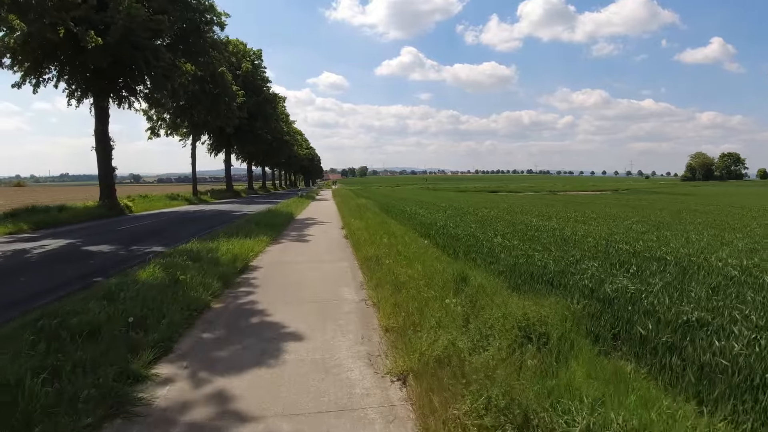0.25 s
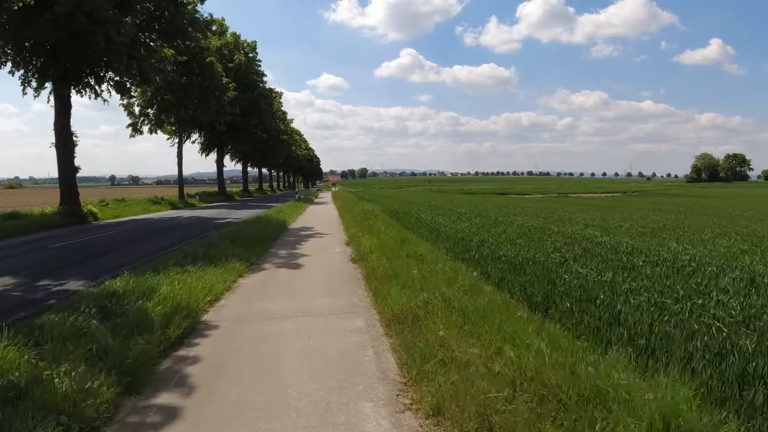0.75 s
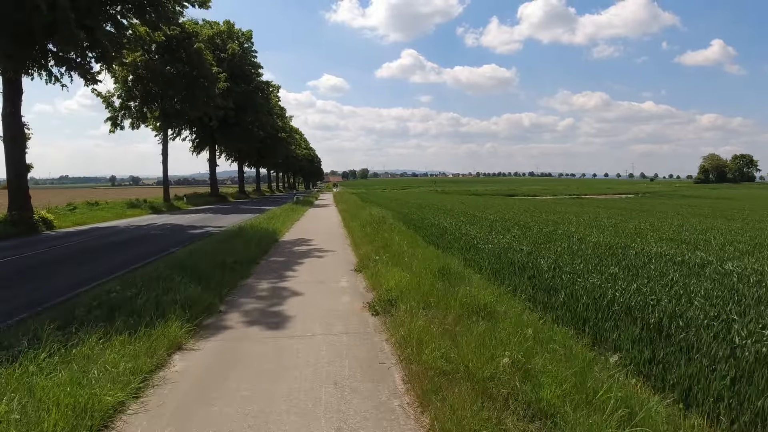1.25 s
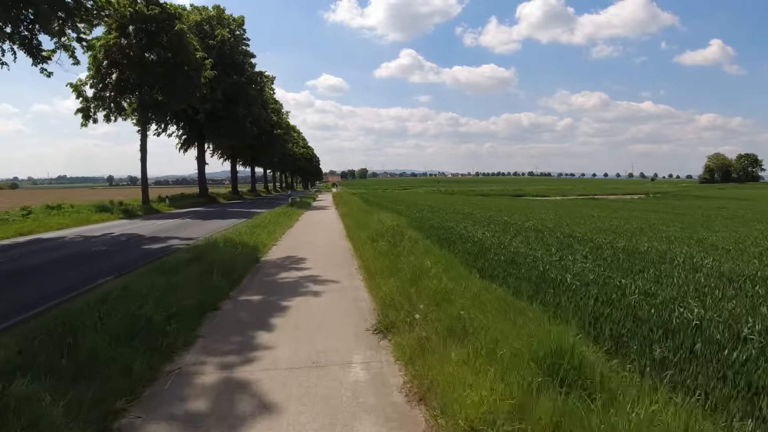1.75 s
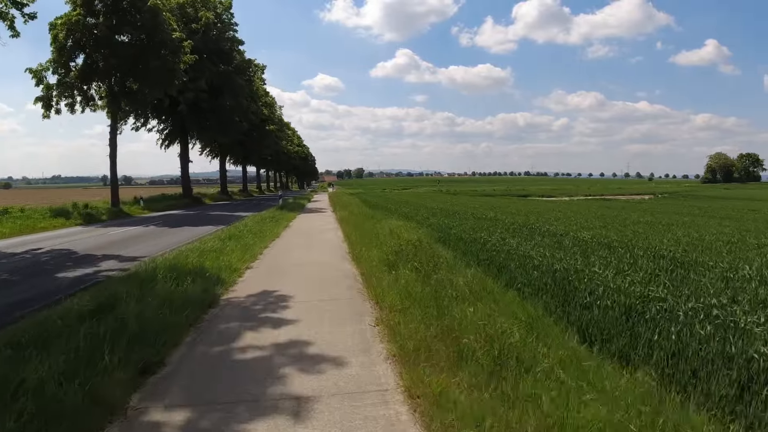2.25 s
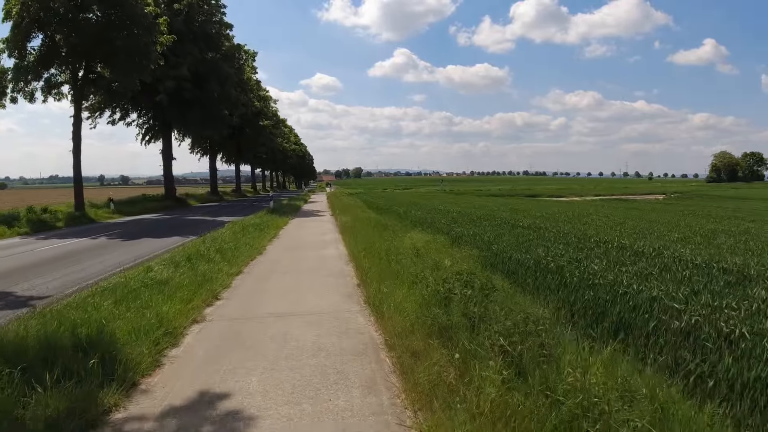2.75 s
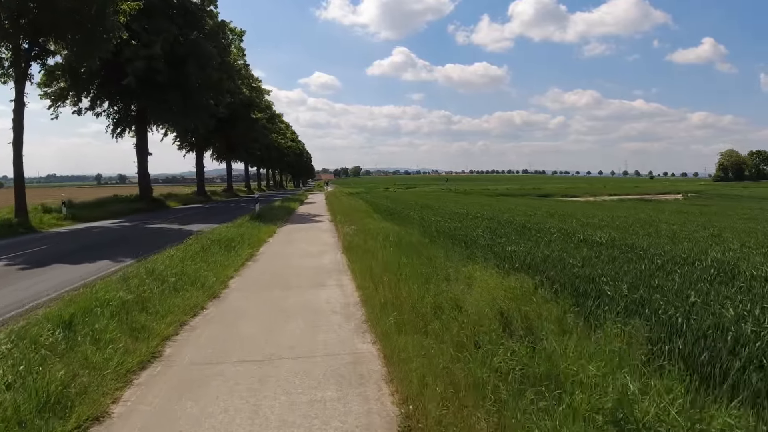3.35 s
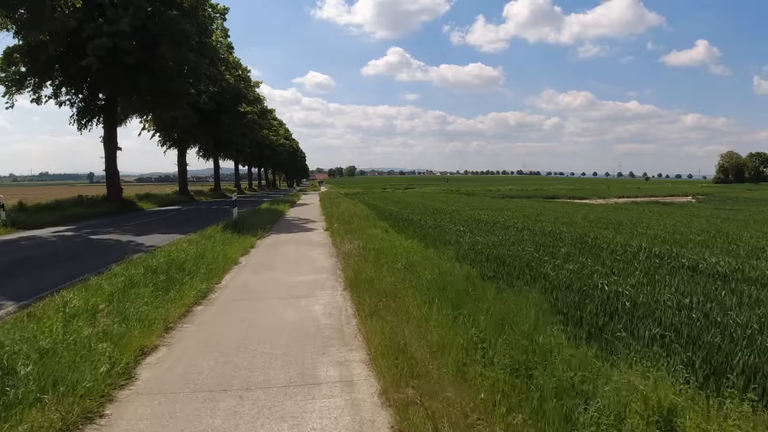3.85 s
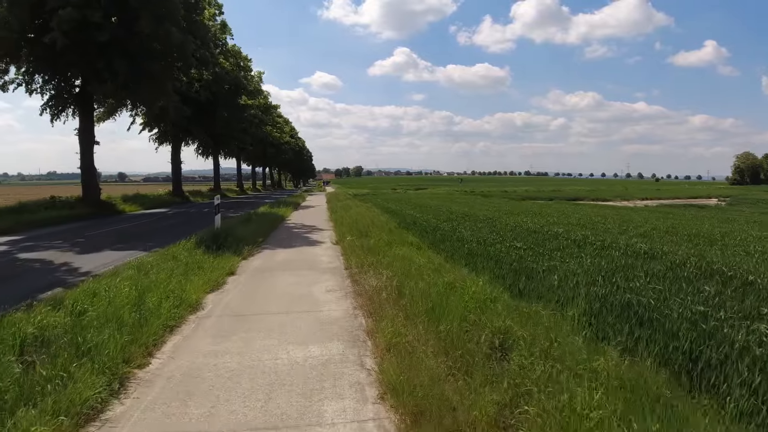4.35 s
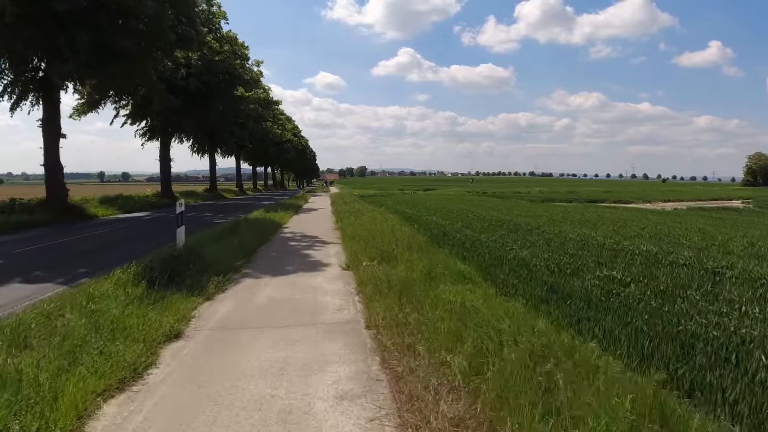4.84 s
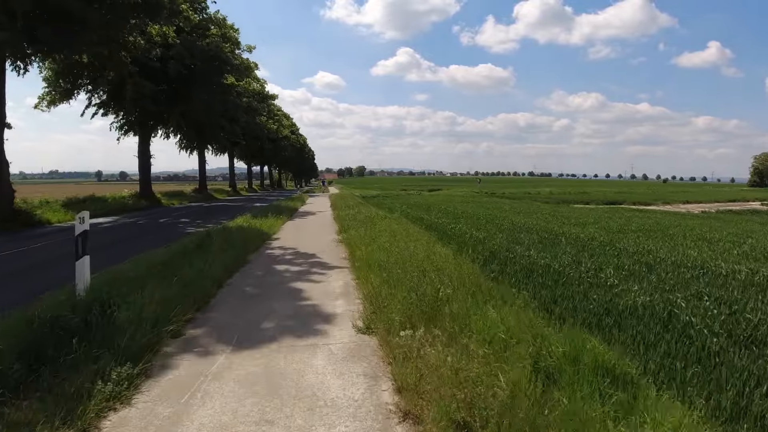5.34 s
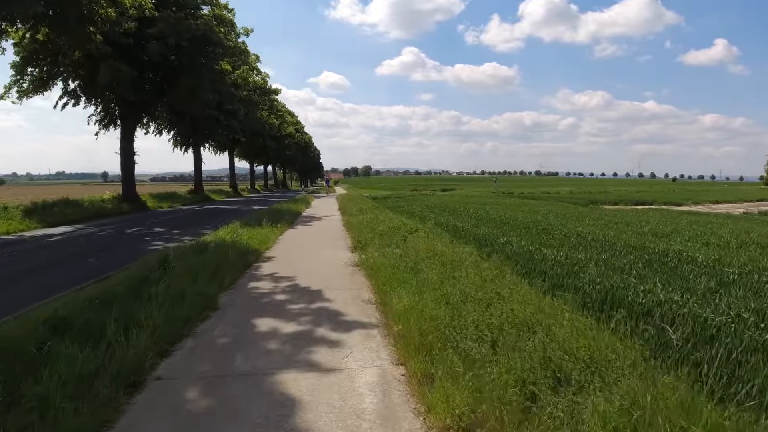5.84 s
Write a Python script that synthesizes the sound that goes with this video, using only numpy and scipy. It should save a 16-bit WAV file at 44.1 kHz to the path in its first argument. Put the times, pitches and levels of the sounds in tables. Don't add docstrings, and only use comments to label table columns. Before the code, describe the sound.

Heard from on board, an electric kick scooter rolls at even speed on a paved path between open fields. A wavering motor hum sits over coarse tyre roar and grit. Wind thumps and flutters at the stereo microphone, strongest around two seconds, then mostly eases. Loose parts click and rattle on bumps, the deck knocks dully now and then, and the last second or so is rougher, with sharp clatter.

```python
import sys
import numpy as np
from scipy import signal
from scipy.fft import rfft, irfft, next_fast_len
from scipy.io import wavfile
from scipy.ndimage import uniform_filter1d

SR = 44100
rng = np.random.default_rng(int(sys.argv[2]) if len(sys.argv) > 2 else 0)


def store_pcm(level_fs):
    pcm = np.round(np.clip(level_fs, -1, 1) * 32767).astype(np.int16)
    wavfile.write(sys.argv[1], SR, np.atleast_2d(pcm).T)


def level_to_linear(level):
    exponent = np.asarray(level, float) / 20
    return 10 ** exponent


N = 268613


def rms_one(x):
    return x / np.sqrt(np.mean(x ** 2) + 1e-20)


def in_time(rows):
    s, *columns = np.transpose(rows)
    return [np.interp(np.arange(N) / SR, s, column) for column in columns]


def at_hz(points, hz):
    table_hz, value = np.transpose(points)
    return np.interp(np.log(hz + 1), np.log(table_hz), value)


def drift(rate):
    r = np.exp(-80 * np.pi * rate / SR)
    slow = signal.lfilter([1], [1, -2 * r, r * r], rng.standard_normal(N // 40 + 2002))[2000:]
    return np.interp(np.arange(N) / 40, np.arange(len(slow)), rms_one(slow))


def coloured(x, response):
    margin = 4096
    size = next_fast_len(N + 2 * margin)
    x = np.pad(x, [(0, 0)] * (x.ndim - 1) + [(margin, margin)], mode="reflect")
    hz = np.arange(size // 2 + 1) * SR / size
    return irfft(rfft(x, size) * response(hz), size)[..., margin:margin + N]


def noise(colour, channels):
    return rms_one(coloured(rng.standard_normal((channels, N)), lambda hz: level_to_linear(at_hz(colour, hz))))


def evened(x, seconds, share):
    length = int(seconds * SR)
    power = uniform_filter1d(uniform_filter1d(x ** 2, length), length)
    return rms_one(x / (power + 0.018) ** (share / 2))


def humps(times, widths):
    time = np.arange(0, N + 32, 32) / SR
    return np.exp(-.5 * ((time - np.reshape(times, (-1, 1))) / np.reshape(widths, (-1, 1))) ** 2)


def summed(weights, shapes):
    return np.interp(np.arange(N) / 32, np.arange(shapes.shape[1]), weights @ shapes)


def ring(clicks, hz, t60):
    r, w = level_to_linear(-60 / (t60 * SR)), 2 * np.pi * hz / SR
    return signal.lfilter([0, np.sin(w)], [1, -2 * r * np.cos(w), r * r], clicks + 1e-18)


def bursts(rows, cycles, level_db, rise_share):
    out = np.zeros(N + 2 * SR)
    for s, db, hz in rows:
        u = np.arange(-round(4 * cycles / hz * SR), round(5 * cycles / hz * SR)) / SR
        width = cycles / hz * np.where(u < 0, rise_share, 2 - rise_share)
        at = SR + round((s + u[0]) * SR)
        out[at:at + len(u)] -= level_to_linear(db + level_db) * np.exp(-.5 * (u / width) ** 2) * np.sin(2 * np.pi * hz * u)
    return out[SR:SR + N]


# time_s, winding_pitch_hz, motor_load_db, surface_roughness_db
RIDE = [(0.0, 193.6, -47.5, -1.5), (.5, 196.4, -47.5, -1.5), (.8, 195.0, -51.5, -0.5),
        (1.25, 193.8, -48, -2.5), (1.55, 195.5, -48.5, 0), (2.15, 194.4, -50.5, -2.5),
        (2.45, 194.5, -45.5, -1.5), (2.9, 195.0, -47, -1), (3.4, 196.1, -47, 0.5), (3.75, 196.2, -45, 1.7),
        (4.2, 194.7, -44.5, 0.4), (4.55, 195.4, -46.5, 0.4), (4.85, 196.3, -46, 2),
        (5.3, 196.4, -49.5, 3.5), (5.5, 196.0, -44.5, 2.9), (5.7, 197.5, -48.5, 0), (6.09, 196.8, -46, 2.5)]
# time_s, change_db
SURGES = [(.18, -7), (.35, -10), (0.579, -7), (.83, 0.5), (.94, -5), (1.09, -1), (1.16, -2.5), (1.37, 0.5),
          (1.45, -1.5), (1.74, -12.5), (1.94, -4.5), (2.07, -5), (2.23, -16), (2.36, -10.5), (2.62, -2.5),
          (3.01, 0.5), (3.2, -1.5), (3.27, -2.5), (3.47, -0.5), (3.62, -2.5), (3.89, -7), (4.088, -3.5),
          (4.22, -4), (4.34, -5.5), (4.45, -9), (4.55, -6), (4.66, -7.5), (4.95, -6.5), (5.07, -3),
          (5.21, -8),
          (5.32, -29), (5.39, -9.5), (5.55, -3), (5.78, -5.5), (5.9, 3.5), (3.15, 6), (3.73, -0.5),
               (3.97, -3), (4.802, 6), (5.02, 5), (5.26, 10)]
# multiple_of_winding_pitch, level_db
MOTOR_ORDERS = [(.995, -16), (2, 0), (2.968, -10), (3.96, -21)]


def motor():
    pitch_hz, load_db, _ = in_time(RIDE)
    s, change_db = np.transpose(SURGES)
    hum_db = load_db + 0.98 * summed(change_db, humps(s, 0.024))
    turn = 2 * np.pi * np.cumsum(pitch_hz * (1 + 0.00299 * drift(0.8014))) / SR
    orders = 0
    for multiple, db in MOTOR_ORDERS:
        wobble_rad = .3 * multiple * drift(5)
        orders = orders + level_to_linear(db + 2.4 * drift(15)) * np.sin(multiple * turn + wobble_rad)
    return level_to_linear(hum_db + 2.5) * orders


# pitch_hz, width_hz, height_above_noise_db
FRAME = [(376.5, 7.8, 13.5), (410, 44.5, 11.5), (452, 39, 4.5), (589.4, 19, 9.5), (654.5, 7.8, 10),
         (765, 79, 7.5), (908, 7.8, 9.5), (1102, 45, 10.5), (1142, 40, 11), (1198, 37, 6.5),
         (1496, 79, 5.5), (1634, 17, 9), (1725, 58, 7.5), (2600, 53, 7.5), (3058, 52, 9), (3462, 53, 10.5),
         (3960, 100, 2.5), (5320, 150, 8.5)]


def frame_gain(hz):
    peaks = [level_to_linear(2 * db) / (1 + (2 * (hz - centre) / width) ** 2) for centre, width, db in FRAME]
    return np.sqrt(1 + sum(peaks))


def patchy(x):
    centres = 420 * 2 ** np.arange(0, 3.6, .5)
    out = 0
    for k in range(len(centres)):
        only_k = np.arange(len(centres)) == k
        band = coloured(x, lambda hz: np.interp(np.log(hz + 1), np.log(centres), only_k))
        out = out + band * level_to_linear(1.12 * drift(6.2) - 0.45)
    return out


# pitch_hz, level_db
ROAR = [(60, -30.5), (150, -16.5), (330, -9.5), (460, -3.5), (650, -5), (720, -15), (950, -8),
        (1350, -12.5), (2000, -22.5), (3000, -46.5), (6000, -95)]
GRIT = [(400, -38.5), (900, -18.5), (1600, -3), (2200, -4), (3200, -12.5), (4000, -13.5), (5000, -25.5),
        (5600, -40.5), (7000, -62.5), (9000, -72.5)]


def tyres(rough_db):
    roar = noise(ROAR, channels=2) * level_to_linear(1.0 * drift(11.0) + 0.46 * drift(60))
    grit = noise(GRIT, channels=2) * level_to_linear(0.68 * drift(17.0) + 0.51 * drift(100))
    roar = rms_one(coloured(roar, frame_gain)) * level_to_linear(-47.5 + 0.74 * rough_db)
    grit = rms_one(coloured(grit, frame_gain)) * level_to_linear(-56 + 0.71 * rough_db)
    return patchy(roar + grit)


# pitch_hz, level_db
HISS = [(2000, -34), (4500, -8.5), (6000, -0.5), (7800, -5.5), (9000, -1), (11500, -1), (12600, 1.5),
        (13500, 5), (14300, -4), (16000, -13)]


def hiss(rough_db):
    time = np.arange(N) / SR
    hiss_db = -91 + 0.27 * time + 0.3 * rough_db
    body = noise(HISS, channels=2) * level_to_linear(hiss_db + 6.0 + 0.91 * drift(8))
    sheen = coloured(body, lambda hz: 1 / (1 + (12500 / (hz + 1)) ** 60))
    sheen_gain = level_to_linear(-11.5 + 1.6 * time + 3.0 * drift(9.0))
    return body + sheen * (sheen_gain - 1)


# pitch_hz, level_db
RUMBLE = [(12, -38.5), (30, -1.5), (100, -5), (200, -26), (300, -29), (1000, -86.5)]


def rumble():
    return level_to_linear(-54) * noise(RUMBLE, channels=1)


# pitch_hz, level_db
WIND_COLOUR = [(5, -41), (18, 0), (30, 2), (60, 1), (110, -1.5), (160, -11.5), (240, -22), (400, -48),
               (1500, -110)]
FLUTTER_COLOUR = [(20, -59.5), (60, -31), (120, -3.5), (170, -4), (220, -6.5), (300, -48.5), (900, -75.5),
                  (3000, -120)]
WHIP_COLOUR = [(60, -62), (200, -13.5), (260, -5), (330, -5.5), (450, -9.5), (700, -22.5), (3000, -100)]
# time_s, level_db
BREEZE = [(0.0, -49.5), (.3, -50.5), (.7, -43.5), (1.0, -44.5), (1.22, -46), (1.4, -46.5), (1.6, -49),
          (1.9, -51), (2.3, -34.5), (2.53, -38), (2.62, -52.5), (2.92, -67), (3.2, -60), (3.66, -60.5),
          (3.85, -46.5), (4.9, -51), (5.55, -48), (6.09, -46)]
# peak_s, peak_db, half_length_s, flutter_relative_db
GUSTS = [(0.107, -44, 0.036, -18), (0.404, -43, 0.042, -9.5), (0.49, -32.5, 0.019, -25),
         (0.714, -44, 0.036, 3), (0.795, -23, 0.011, -7.5), (0.865, -45.5, 0.037, 5),
         (1.086, -34.5, 0.016, -6), (1.314, -57, 0.011, 10), (1.46, -41.5, 0.045, 1.5),
         (1.48, -29, 0.027, 0), (1.608, -39, 0.015, -4), (1.71, -34, 0.028, 1.5), (1.738, -50, 0.011, 0),
         (1.848, -32.5, 0.037, -4), (1.937, -33.5, 0.024, -2.5), (2.052, -32.5, 0.04, 2),
         (2.12, -30, 0.013, -24), (2.24, -38, 0.035, -8), (2.372, -37.5, 0.029, 12), (2.475, -38, 0.032, 6),
         (3.078, -34.5, 0.062, -3.5), (3.333, -29, 0.049, -1), (3.48, -33.5, 0.046, -21),
         (4.734, -36.5, 0.039, -32), (4.494, -35.5, 0.035, -6), (5.177, -41, 0.043, -1),
         (5.306, -36.5, .04, -30), (5.462, -46.5, 0.037, 2), (5.78, -31.5, 0.066, -2),
         (6.026, -33, 0.045, -25)]
# peak_s, peak_db
WHIPS = [
    (1.75, -55),
    (2.23, -45),
    (2.43, -43),
    (3.69, -52.5),
    (4.26, -64),
    (4.329, -61),
    (4.97, -53),
    (5.8, -46),
    (5.96, -54),
]


def wind():
    breeze = level_to_linear(in_time(BREEZE)[0])
    gust_s, gust_db, half_s, flutter_db = np.transpose(GUSTS)
    gust_db = gust_db - 9
    gusts, late_gusts = humps(gust_s, half_s), humps(gust_s + 0.034, half_s)
    whip_s, whip_db = np.transpose(WHIPS)

    low_gain = (breeze + summed(level_to_linear(gust_db), gusts)) * level_to_linear(2.5)
    flutter_gain = breeze * level_to_linear(-5.5) + summed(level_to_linear(gust_db + flutter_db), gusts)
    whip_gain = breeze * level_to_linear(-19) + summed(level_to_linear(gust_db - 14 + 0.092 * flutter_db), late_gusts)
    whip_gain = whip_gain + summed(level_to_linear(whip_db), humps(whip_s, 0.032))

    low = evened(noise(WIND_COLOUR, channels=2), 0.015, share=0.87) * low_gain
    flutter = evened(noise(FLUTTER_COLOUR, channels=2), 0.09, share=0.53) * flutter_gain
    flutter = flutter * level_to_linear(2.9 * drift(44))
    whip = evened(noise(WHIP_COLOUR, channels=2), 0.054, share=0.37) * whip_gain
    whip = whip * level_to_linear(2.5 * drift(21))
    lumps = rms_one(level_to_linear(1.9 * drift(7.5)))
    return (low + flutter + whip) * lumps


def cricket():
    hz = 13700
    turn = 2 * np.pi * 9.75 * np.arange(N) / SR + .7 * drift(.8)
    chirps = np.clip(np.sin(turn), 0, 1) * level_to_linear(1.5 * drift(3))
    tone = noise([(hz - 700, -70), (hz - 150, -3), (hz + 150, -3), (hz + 700, -70)], channels=1)
    return level_to_linear(-96) * chirps * tone * [[1], [-1]]


# start_s, peak_db, weight_db (big parts), ring_db (small bright parts)
BUMPS = [(0.058, -44.5, 7, 10.5), (0.465, -47, 8, 3.5), (0.636, -46, 1.5, -3), (0.7262, -66, 6, -10.5),
         (1.061, -47.5, -8.5, -4), (1.269, -44.5, 6, 3.5), (1.5322, -37.5, -5, 5.5), (1.5454, -48, -3, 9.5),
         (1.577, -44, -5.5, -3.5), (1.71, -44, -1.5, 5.5), (1.7358, -45, -23.5, 11.5),
         (2.268, -41, -12, 9.5), (2.9526, -45, -1.5, 10.5), (3.33, -41, -2, -0.5),
         (3.348, -36.5, -11, -2.5), (3.9798, -35.5, -26, 2.2), (4.039, -47, -2, 2), (4.2252, -44, -5.5, 6),
         (4.275, -35, -7, -0.5), (4.432, -40.5, 7, 9.5), (4.6866, -46.5, 9.5, 10.5),
         (4.804, -31.5, -4, 0.5), (4.8194, -36, -11.5, -6.5), (4.852, -37, -6.5, -2.5)]
LATE_BUMPS = [(5.0754, -40.5, -15, 0.5), (5.094, -35.5, 0.5, 3.5), (5.118, -33.5, -5.5, -4),
              (5.16, -50, 6, -4.5), (5.258, -45.5, 1, 5.5), (5.2997, -33, 2.5, -3),
              (5.312, -46.5, 7.5, -16), (5.4017, -61.5, -6, 0), (5.4835, -36, 0, -3),
              (5.696, -36, -2.5, 2.5), (5.851, -39.5, 6.5, 3), (5.866, -39.5, 5, 5),
              (5.906, -32.5, 5.5, 0.5)]
# pitch_hz, level_db, ring_time_s (to fall 60 dB)
PARTS = [(586, -9.5, 0.092), (874, -2.5, 0.049), (1200, 3, 0.004), (1690, -0.5, 0.011), (2120, -3.5, 0.015),
         (2543, -5, 0.034), (2918, -8, 0.038), (3440, -7, 0.03), (4230, -15, 0.024), (5000, -24, 0.014)]


def rattles():
    out, time = np.zeros((2, N)), np.arange(int(.15 * SR)) / SR
    contacts = (rng.random((2, N)) < 4500 / SR) * rng.standard_normal((2, N))
    pebbles = []
    for _ in range(18):
        s = rng.random() * (N / SR - .1) + 0.0047
        pebbles.append((s, -57.5 + 5 * rng.standard_normal(), -2.5, 4 * rng.standard_normal()))
    bumps = pebbles + BUMPS + LATE_BUMPS
    contacts[0, [round((row[0] + .003) * SR) for row in bumps]] = 1.4
    spread_db = .8 * rng.standard_normal((len(bumps), len(PARTS)))
    swell = 2.49 * (1 - np.exp(-time / 0.0046)) * np.exp(-time / 0.01)
    for k, (hz, part_db, t60) in enumerate(PARTS):
        shake = np.zeros(N + len(time))
        for (s, db, low_db, ring_db), chance_db in zip(bumps, spread_db[:, k]):
            at = round((s - .0005) * SR)
            weight_db = low_db * np.clip(np.log2(2000 / hz), 0, 1)
            weight_db += ring_db * (3200 < hz < 3800)
            shake[at:at + len(time)] += level_to_linear(db + part_db + weight_db + chance_db) * swell
        out += (-1) ** k * ring(shake[:N] * contacts, hz, t60)

    jolt = np.zeros(N + len(time))
    for s, db, *_ in bumps:
        at = round(s * SR)
        jolt[at:at + len(time)] += level_to_linear(db + 8.5) * swell
    crackle_band = signal.butter(2, [700, 4200], "band", fs=SR, output="sos")
    out += signal.sosfilt(crackle_band, jolt[:N] * contacts + 1e-18)
    return level_to_linear(-20.0) * signal.sosfilt(signal.butter(6, 5450, fs=SR, output="sos"), out)


def roughness():
    _, _, rough_db = in_time(RIDE)
    s, db, *_ = np.transpose(BUMPS + LATE_BUMPS)
    hardness = level_to_linear(np.minimum(db + 33.5, 0) / 2)
    return rough_db + 0.5 * summed(hardness, humps(s + 0.012, 0.033))


# peak_s, peak_db, pitch_hz
SNAPS = [(0.064, -47, 2200), (0.335, -42, 1600), (0.472, -45, 2000), (0.571, -44, 2600),
         (0.638, -35.5, 1900), (0.643, -43, 2300), (4.69, -40.5, 2200), (0.729, -42, 1700),
         (1.274, -36.5, 1500), (1.535, -38, 2000), (1.549, -42, 1800), (1.597, -43, 1200),
         (1.716, -47, 1600), (4.806, -36, 2000), (4.813, -41.5, 1800), (5.1, -41, 1800),
         (5.301, -34.5, 1800), (5.855, -41, 2200), (5.915, -39, 2000), (1.737, -36.5, 2600),
         (2.27, -39.5, 2600), (2.954, -38, 2460), (4.823, -38, 1100), (5.122, -28.5, 1490),
         (5.162, -35, 1510), (5.309, -39, 1820), (5.7, -36, 2000), (5.866, -33, 1300), (5.9085, -33, 1390)]


def snaps():
    return coloured(bursts(SNAPS, 0.4, 0.5, rise_share=0.48), lambda hz: 1 / (1 + (hz / 3900) ** 10))


# peak_s, peak_db, pitch_hz
TICKS = [(0.068, -46, 2520), (0.345, -42, 1750), (0.671, -42.5, 1588), (0.731, -41, 1904),
         (1.503, -46, 1720), (1.551, -53, 1760), (1.634, -57, 1739), (1.715, -46, 2110),
         (2.962, -43.5, 2520), (3.334, -54, 1739), (3.349, -35.5, 1720), (3.677, -41, 1588),
         (3.697, -54, 1739), (3.985, -38.5, 2086), (4.276, -47, 1750), (4.602, -43, 1740),
         (4.806, -46.5, 2086), (4.812, -47, 2480), (4.821, -42.5, 2086), (4.828, -52, 2501),
         (4.833, -42, 2501), (4.851, -43, 2470), (4.864, -49, 1588), (4.904, -43, 1750), (5.079, -57, 2100),
         (5.099, -39, 2080), (5.111, -46, 1720), (5.121, -38.5, 2040), (5.129, -56, 2501),
         (5.138, -32, 1600), (5.151, -55, 1588), (5.162, -50, 1600), (5.206, -43, 1588),
         (5.301, -43.5, 2086), (5.312, -46, 1600), (5.333, -44, 1600), (5.418, -42, 1580),
         (5.493, -41, 1739), (5.545, -53, 1739), (5.7, -53, 2060), (5.719, -40, 1590), (5.795, -45, 1730),
         (5.859, -40, 2501), (5.869, -53, 1739), (5.876, -40, 2480), (5.91, -49, 2100), (5.916, -36, 2550)]
THUDS = [(1.315, -41, 824), (4.82, -42, 1130), (4.828, -45, 683), (5.123, -36.5, 1170), (5.149, -48, 1090),
         (5.161, -40, 1240), (5.313, -32, 1178), (5.379, -53, 1060), (5.705, -42, 1040), (5.747, -42, 1060),
         (5.847, -33, 1170), (5.863, -40, 1060), (5.88, -49, 960), (5.913, -34, 1180), (5.922, -48, 1199)]
PINGS = [(4.822, -52, 3520), (5.082, -48, 3420), (5.102, -51, 3440), (5.123, -44, 3420), (5.304, -47, 3450),
         (5.492, -45, 2930), (5.703, -46, 3440), (5.857, -45, 3450), (5.869, -48, 3460), (4.93, -60, 4700),
         (5.23, -52, 2540), (5.68, -58, 4620)]


def single_rings():
    ticks = bursts(TICKS, 4.0, -4.5, rise_share=0.48)
    thuds = bursts(THUDS, 3.7, -6.5, rise_share=0.48)
    pings = bursts(PINGS, 21, -4.5, rise_share=0.48)
    return ticks + thuds + pings


# start_s, peak_db
KNOCKS = [
    (0.722, -47),
    (1.586, -45.5),
    (2.294, -32.5),
    (2.51, -39),
    (3.699, -50.5),
    (4.822, -33),
    (5.472, -42.5),
    (5.8, -49),
]
# pitch_hz, level_db, ring_time_s (to fall 60 dB)
DECK = [(620, 8.5, 0.1), (610, -11, 0.021)]


def knocks():
    s, db = np.transpose(KNOCKS)
    blows = np.zeros(N)
    blows[[round(start * SR) for start in s]] = level_to_linear(db - 10.0)
    soft = signal.sosfilt(signal.butter(4, 720, fs=SR, output="sos"), blows)
    return sum(level_to_linear(level_db) * ring(soft, hz, t60) for hz, level_db, t60 in DECK)


# peak_s, peak_db, swirl_pitch_hz
EDDIES_LEFT = [(0.773, -34, 143), (0.8, -21, 75), (0.841, -46, 66), (0.972, -38, 66), (1.07, -27, 160),
               (1.085, -29.5, 86), (1.322, -27, 126), (1.398, -33.5, 45), (1.439, -40, 45),
               (1.455, -27, 140), (1.485, -36, 86), (1.508, -31, 75), (1.699, -31, 76.4), (1.748, -26, 171),
               (1.888, -37, 51), (1.951, -28, 65.4), (2.02, -29.5, 160), (2.081, -40, 45),
               (2.128, -25, 111), (2.156, -29, 112), (2.213, -22.5, 124), (2.25, -38, 51),
               (2.283, -26.5, 144), (2.317, -36, 126), (2.339, -36, 111), (2.358, -31, 111),
               (2.379, -20.5, 111), (2.422, -25.5, 65.8), (2.449, -26, 66), (2.479, -24, 163),
               (2.516, -29, 142), (3.303, -33.5, 75), (3.329, -31, 126), (3.356, -32, 100),
               (5.786, -26.5, 143), (5.803, -23, 85.5), (5.829, -36, 45), (5.946, -32, 44.8),
               (6.015, -29.5, 45), (6.053, -32, 58)]
EDDIES_RIGHT = [(0.791, -30, 86), (0.827, -34, 66), (0.862, -32.3, 51), (0.971, -37, 51),
                (1.077, -24.5, 143), (1.316, -28, 143), (1.423, -34.5, 51), (1.46, -23.5, 163),
                (1.482, -29, 112), (1.508, -27, 66), (1.708, -31, 66.4), (1.757, -36, 51), (1.853, -28, 45),
                (1.937, -22.5, 142), (1.975, -28.5, 57.7), (2.029, -27.5, 163), (2.08, -42, 45),
                (2.126, -37, 86), (2.169, -26, 126), (2.203, -39, 45), (2.229, -24, 126), (2.257, -37, 51),
                (2.28, -28.5, 143), (2.304, -33.5, 111), (2.343, -23.5, 111), (2.364, -38, 111),
                (2.379, -21, 128), (2.41, -23.5, 57.7), (2.439, -30, 75), (2.469, -23, 126),
                (2.486, -35, 126), (2.524, -29.5, 143), (3.333, -28, 126), (3.363, -25.8, 113),
                (5.782, -32, 126), (5.809, -29, 86), (5.852, -38, 45), (5.94, -29, 45), (6.007, -21.5, 51),
                (6.035, -28.5, 129)]
CURLS = [
    (1.76, -46, 278),
    (2.39, -34, 293),
    (2.415, -44, 338),
    (3.7, -42, 312),
    (4.33, -45, 322),
]


def eddies():
    ports = [bursts(port, 0.57, 0.7, rise_share=1.0) for port in (EDDIES_LEFT, EDDIES_RIGHT)]
    return np.array(ports) + bursts(CURLS, 1.6, 0.7, rise_share=1.0)


# pitch_hz, lag_rad
PORT_LAG = [(200, 0.34), (1200, 0.41), (2500, 0.35), (3000, 0.65), (3500, 2.17), (4300, 3.2), (6000, 4),
            (8700, 10), (16000, 17)]
# pitch_hz, likeness (0 to 1)
PORT_LIKENESS = [(200, 1), (500, 0.99), (750, 0.99), (1000, 0.99), (2700, 0.78), (3200, 0.5), (3500, 1),
                 (4000, 0.64), (4300, 0.82), (5500, 0.5), (16000, 0.7)]


def at_ports(pair):
    alike = lambda hz: np.clip(at_hz(PORT_LIKENESS, hz), 0, 1)
    lag = lambda hz: np.exp(np.outer([-.5j, .5j], at_hz(PORT_LAG, hz)))
    shared = coloured(pair[0], lambda hz: np.sqrt(1 + alike(hz)) * lag(hz))
    different = coloured(pair[1], lambda hz: np.sqrt(1 - alike(hz)) * lag(hz) * [[1], [-1]])
    return (shared + different) * np.sqrt(.5)


def scene():
    rough_db = roughness()
    shared = motor() + knocks() + single_rings() + snaps()
    different = 0.67 * motor()
    scooter = tyres(rough_db) + rattles() + [shared, different]
    air = wind() + eddies() + rumble() + cricket()
    return at_ports(scooter) + air + hiss(rough_db)


def low_pass(x):
    return signal.sosfilt(signal.butter(12, 15720, fs=SR, output="sos"), x)


def record(dry):
    fade = np.interp(np.arange(N) / SR, [N / SR - .006, N / SR], [1, .3])
    return low_pass(dry * fade)


dry = scene()
out = record(dry)
store_pcm(out)
```